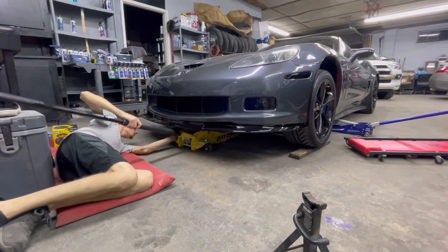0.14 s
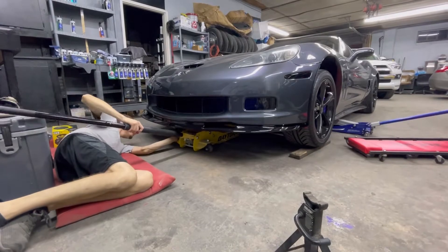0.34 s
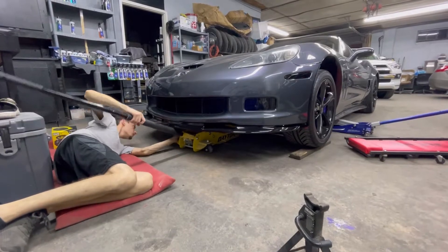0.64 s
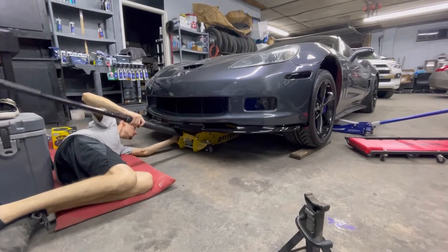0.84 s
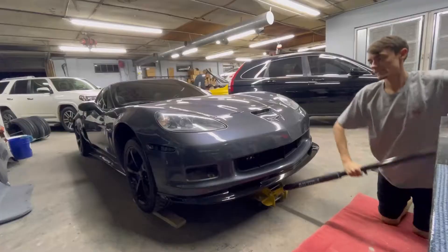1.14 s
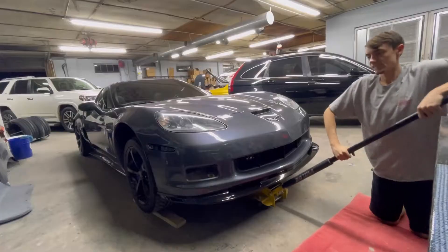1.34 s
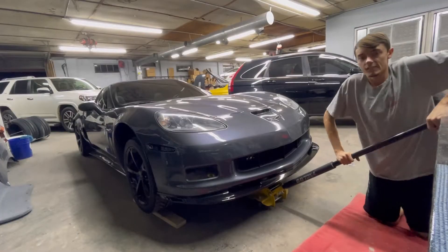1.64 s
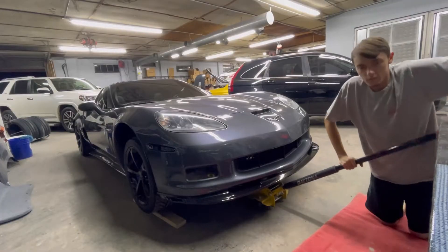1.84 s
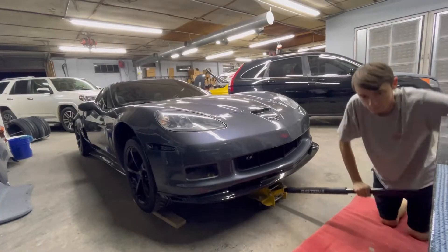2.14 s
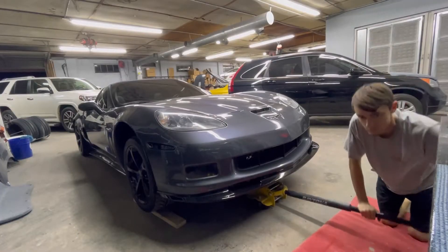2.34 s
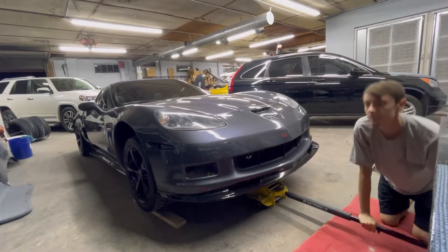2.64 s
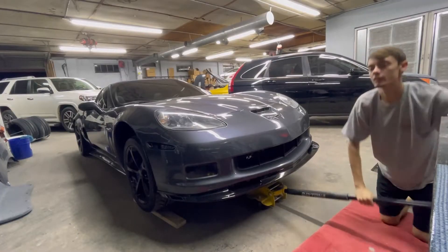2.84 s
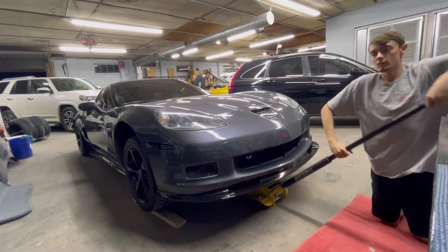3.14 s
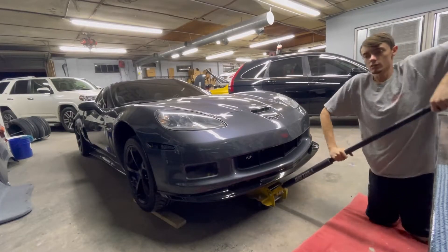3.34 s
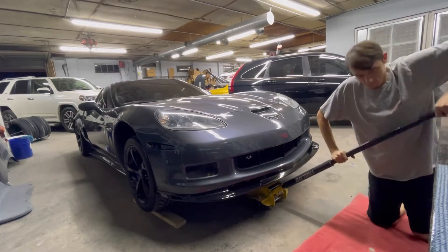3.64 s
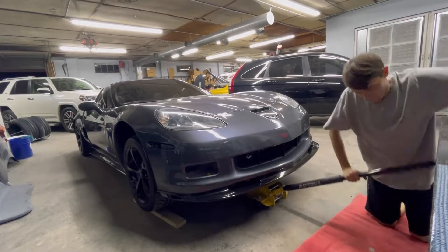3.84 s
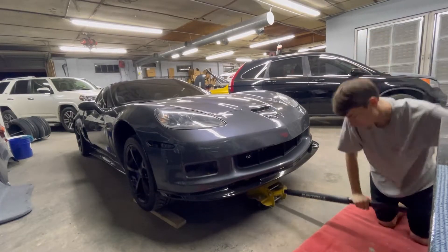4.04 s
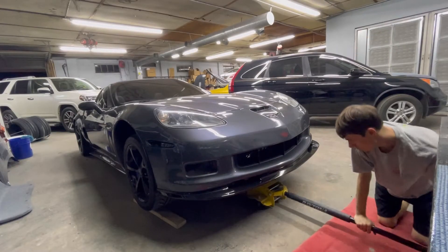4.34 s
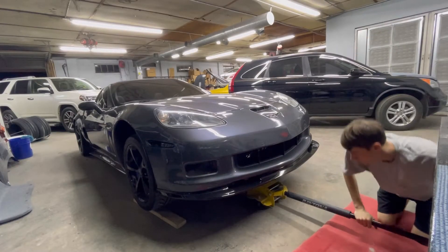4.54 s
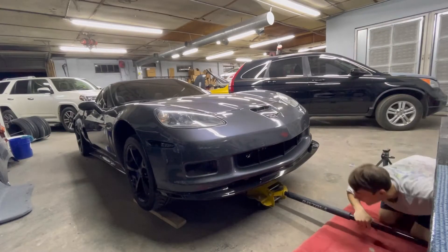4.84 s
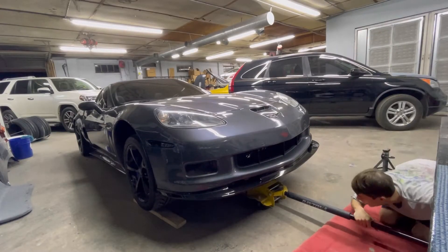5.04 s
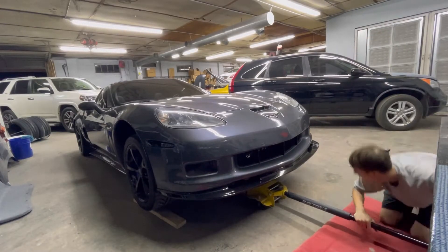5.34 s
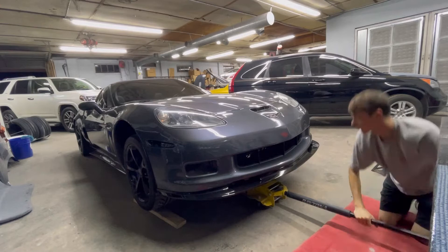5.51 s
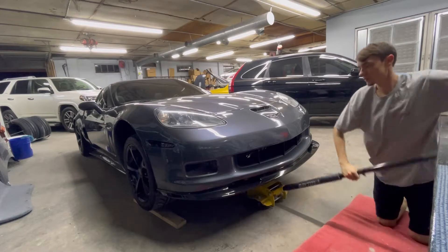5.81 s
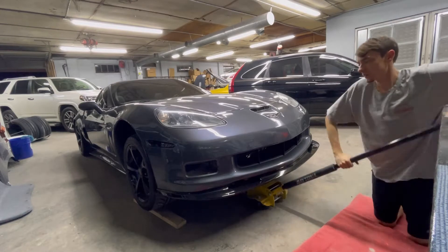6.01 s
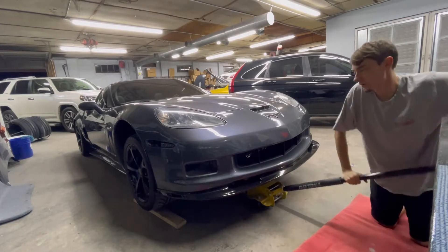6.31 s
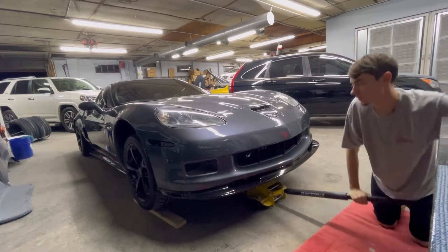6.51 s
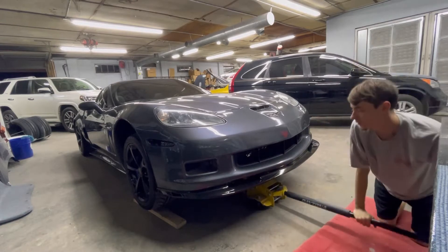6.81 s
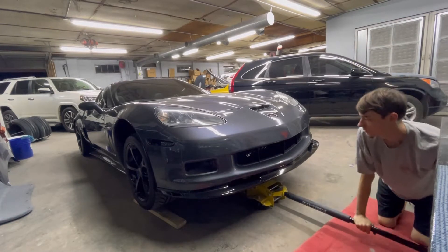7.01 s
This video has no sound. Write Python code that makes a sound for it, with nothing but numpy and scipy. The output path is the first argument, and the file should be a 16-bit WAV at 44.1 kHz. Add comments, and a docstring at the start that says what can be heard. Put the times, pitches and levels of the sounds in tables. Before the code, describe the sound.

In a reverberant garage, a floor jack's long steel handle clinks, then lands with one loud, booming clunk that rings on. Smaller clinks, dull thuds and valve taps follow. Three pump strokes come, each a quick raspy surge of oil with a faint sinking groan; sharp ticks snap around the first two. Clothes rustle on a mat. A faint pulsing high trill and low hum stay underneath. Stereo microphones, somewhat louder on the left.

```python
"""In a garage, a pair of microphones hears a hydraulic floor jack lift a car. Its long steel handle lands with one
loud clunk and clinks in its socket: struck steel modes and short noise bursts. Three pump strokes follow, as clumped
noise for oil and a juddering tone for the piston seal; runs of taps are the valve, and snaps are the lift arm,
around the first two strokes. Clothes rustle on a mat as swelling noise. Over it all lie dull air, narrow bands of
hum and a faint high trill; every source but this room tone is answered by a diffuse echo from the walls."""
import sys
import numpy as np
from scipy import signal
from scipy.fft import rfft, irfft, next_fast_len
from scipy.io import wavfile
from scipy.ndimage import uniform_filter1d, map_coordinates

SR = 44100
rng = np.random.default_rng(int(sys.argv[2]) if len(sys.argv) > 2 else 0)


def bounce(signal):
    """Save signal as a 16-bit WAV file at the path given by the first command-line argument."""
    frames = np.transpose(np.atleast_2d(signal))
    limited = np.clip(frames, -1, 1)
    pcm = np.round(limited * 32767).astype(np.int16)
    wavfile.write(sys.argv[1], SR, pcm)


N = 316197  # length of the scene in samples
T = np.arange(SR) / SR  # time within one blow, in seconds


def amp(db):
    """Decibels to gain."""
    return 10 ** (np.asarray(db) / 20)


def unit(x):
    """Scaled to rms 1."""
    return x / np.sqrt(np.mean(x ** 2) + 1e-20)


def crest(x):
    """Scaled so that the loudest 10 ms have rms 1."""
    power = np.mean(np.atleast_2d(x) ** 2, axis=0)
    return x / np.sqrt(uniform_filter1d(power, size=441).max())


def along(points, hz):
    """Values at hz, read between (Hz, value) points on a log axis."""
    f, v = np.transpose(points)
    return np.interp(np.log(hz + 1), np.log(f + 1), v)


def wobble(rate):
    """A smooth random curve, rate knots a second."""
    knots = rng.standard_normal(int(N * rate / SR) + 4)
    return map_coordinates(knots, [np.arange(N) * rate / SR])


def since(s):
    """Seconds gone by since time s; 0 before it."""
    return np.maximum(np.arange(N) / SR - s, 0)


def arch(s, length):
    """One smooth swell and fade, half a sine long."""
    return np.sin(np.pi * np.minimum(since(s) / length, 1))


def filtered(x, response):
    """x times a response of frequency."""
    n = x.shape[-1]
    m = next_fast_len(n + 8192)  # room for the filter to ring out
    return irfft(rfft(x, m) * response(np.fft.rfftfreq(m, 1 / SR)), m)[..., :n]


def coloured(x, spectrum):
    """Causal (minimum-phase) filter with the given (Hz, dB) points."""
    def response(hz):
        cepstrum = irfft(np.log(amp(along(spectrum, hz)) + 1e-6))
        half = len(cepstrum) // 2
        # folding the cepstrum forward in time makes the filter causal
        return np.exp(rfft(np.r_[cepstrum[0], 2 * cepstrum[1:half], np.zeros(half)]))
    return filtered(x, response)


def grainy(spectrum, rough_db, rate):
    """Coloured noise of rms 1 that comes in clumps, set by rate random knots a second."""
    clumps = amp(rough_db * wobble(rate))
    return unit(coloured(rng.standard_normal(N) * clumps, spectrum))


def fade(t60):
    """Exponential decay by 60 dB in t60 seconds."""
    return amp(-60 * T / max(t60, 1e-3))


def burst(t60):
    """The noise of one contact."""
    return rng.standard_normal(len(T)) * fade(t60)


def snap(t60, scrape_db):
    """One sharp impulse with a short scrape of the faces."""
    scrape = burst(t60)
    return (T == 0) + amp(scrape_db) * scrape / np.linalg.norm(scrape)


def ring(modes, scatter_db, longest):
    """Damped modes, struck at new strengths; none rings beyond the longest t60."""
    out = np.zeros(len(T))
    for hz, db, t60 in modes:
        strength = amp(db + scatter_db * rng.normal())
        out += strength * fade(min(t60, longest)) * np.sin(2 * np.pi * hz * T)
    return out


def add(track, s, x):
    """Mix x into the track at time s."""
    part = track[:, round(s * SR):][:, :x.shape[-1]]
    part += x[..., :part.shape[1]]


# how alike the diffuse sound is at the two microphones: f/Hz, likeness (1 same, 0 unrelated, -1 opposed)
LIKENESS = [(60, 0.92), (130, 0.24), (290, 0.69), (640, 0.021), (3000, -.15), (8000, -.25), (13000, -0.71)]


def diffuse(count):
    """Stereo noise from all sides: alike in the deepest bass, increasingly opposed in the treble."""
    def turn(hz):
        return np.arccos(np.clip(along(LIKENESS, hz), -1, 1)) / 2
    noise = rng.standard_normal((2, count))
    mid, side = filtered(noise, lambda hz: np.array([np.cos(turn(hz)), np.sin(turn(hz))]))
    return np.array([mid + side, mid - side])


# how long the garage walls answer: f/Hz, t60/s
WALL_DECAY = [(100, 0.56), (500, 0.5), (2000, .46), (6000, 0.38), (14000, 0.2)]
LEAD_S = 20 / SR  # head start of the left microphone


def garage(x, wet_db):
    """Direct sound reaches the left microphone first; the walls answer with a diffuse tail."""
    hz, t, z = signal.stft(diffuse(count=SR * 3 // 4), SR, nperseg=256)
    decay = amp(-60 * t / along(WALL_DECAY, hz)[:, None])
    tail = signal.istft(z * decay, SR, nperseg=256)[1]
    echo = signal.fftconvolve(x[None], tail / np.linalg.norm(tail[0]), axes=1)[:, :len(x)]
    late = np.pad(x, (round(LEAD_S * SR), 0))[:len(x)]
    return np.array([x, late]) + amp(wet_db) * echo


def narrow(centre_hz, width):
    """Diffuse noise of rms 1 in one narrow band, about width Hz across at half amplitude."""
    return unit(filtered(diffuse(count=N), lambda hz: 1 / (1 + (1.9 * (hz - centre_hz) / width) ** 2)))


# colour of the still air: f/Hz, relative level/dB
AIR_COLOUR = [(20, -20.5), (65, 1.5), (220, -15.5), (320, -21.5), (1100, -15.5), (1750, -24.5), (2200, -23),
              (3000, -33), (4200, -42), (5800, -33.5), (7400, -40.5), (8500, -37), (11000, -43),
              (15500, -49)]
# steady narrow bands in the room, low hum upwards: f/Hz, width/Hz, rms level/dB
HUM_BANDS = [(159, 8, -73.5), (233.2, 14, -75), (1120, 200, -79.5), (2110, 130, -75.5), (2580, 25, -84),
             (6180, 330, -74.5)]
TRILL_DB, TRILL_SWING_DB, TRILL_DRIFT_DB = -68.5, 1.5, 0.2  # middle level, regular swell, slow chance
TRILL_PERIOD_S, TRILL_CREST_S = 0.6, 2.2  # time between swells, and the top of one of them


def room_tone():
    """Dull air noise with narrow bands of hum, and a high trill that swells and sinks at a steady pace."""
    out = amp(-64.0) * unit(coloured(diffuse(count=N), AIR_COLOUR))
    for centre_hz, width, db in HUM_BANDS:
        out += amp(db) * narrow(centre_hz, width)
    swell = np.cos(2 * np.pi * (np.arange(N) / SR - TRILL_CREST_S) / TRILL_PERIOD_S)
    trill_db = TRILL_DB + TRILL_SWING_DB * swell + TRILL_DRIFT_DB * wobble(rate=3)
    return out + amp(trill_db) * narrow(centre_hz=5037, width=230)


# the body shifts on the mat: start t/s, length t/s, swish level/dB (before a common trim), scuff level/dB
RUSTLES_ON_MAT = [(0.0, 0.043, -69, -56), (1.05, 0.19, -57.5, -72), (1.235, 0.19, -69.5, -73),
                  (1.513, 0.13, -87, -62.5), (2.657, 0.43, -58.5, -70.5), (4.376, 0.21, -58.5, -59),
                  (5.676, 0.098, -72, -69.5), (6.927, 0.21, -62, -64.5)]
# colour of fabric brushing fabric: f/Hz, relative level/dB
SWISH_COLOUR = [(3530, -44), (6000, -10.5), (9040, -3), (10500, -10.5), (13100, -6.5), (16000, -44)]
# colour of knees on the mat: f/Hz, relative level/dB
SCUFF_COLOUR = [(100, -22.5), (250, -5), (1200, -10), (2500, -14.5), (4000, -19.5), (6500, -22),
                (10000, -33.5)]
# the handle is pushed down, heard in clothes, valve, oil and seal: start t/s, length t/s,
# opening surge level/dB, surge decay t/s (time constant), steady flow level/dB,
# closing swell level/dB (lost under the steady flow in the third),
# starting groan f/Hz, groan level/dB, sleeve swish level/dB (before the swish trim)
PUMP_STROKES = [(1.871, 0.695, -46.5, 0.13, -77, -61, 205, -60.5, -75),
                (3.724, 0.58, -49.5, 0.052, -65.5, -58.5, 200, -58.5, -68),
                (6.258, 0.656, -55.5, 0.051, -53.5, -82, 235, -64, -74)]
SLEEVE_SCUFF_DB, SLEEVE_S = -2.5, 0.43  # sleeves rub in every stroke: scuff against untrimmed swish, length


def clothes():
    """Fabric swishes and knees scuff on the mat, each move swelling and fading."""
    swish, scuff = np.zeros(N), np.zeros(N)
    sleeves = [(s, SLEEVE_S, db, db + SLEEVE_SCUFF_DB) for s, *_, db in PUMP_STROKES]
    for s, length, swish_db, scuff_db in RUSTLES_ON_MAT + sleeves:
        move = arch(s, length)
        swish += amp(swish_db) * move
        scuff += amp(scuff_db) * move
    fabric = amp(-7.0) * swish * grainy(SWISH_COLOUR, rough_db=3.5, rate=470)
    knees = scuff * grainy(SCUFF_COLOUR, rough_db=5.5, rate=91)
    return garage(fabric + knees, wet_db=4)


# the handle shifts in its socket: t/s, level/dB (before the edge and body trims), body against edge level/dB
HANDLE_CLINKS = [(0.0981, -45.5, 3), (0.539, -53, -2), (0.676, -49.5, 3), (0.772, -45, 0),
                 (1.4576, -51, -1.5), (2.7168, -51.5, -4.5), (3.286, -49, -2.5), (5.5415, -49.5, -9),
                 (6.015, -45, -3.5)]
# modes of the gripped socket: f/Hz (before scatter), level/dB, free t60/s (the grip cuts it short)
SOCKET_MODES = [(2418, -9, 0.16), (3890, -9.5, 0.13), (5210, 2.5, .12), (5680, -7, .12), (8220, -6, 0.22),
                (9400, -5.5, 0.1516), (13100, -8.5, .12)]
# colour of the bright edge: f/Hz, relative level/dB
CLINK_EDGE = [(2000, -18), (4400, -17), (5400, -1), (6100, -8), (7200, -10), (8200, -4.5), (9400, -3),
              (10500, -14), (13000, -0.5), (15800, -21.5)]
# colour of the duller body: f/Hz, relative level/dB
CLINK_DULL = [(120, -39), (200, -9.5), (355, -3), (568, -9.5), (996, -2), (2060, -12), (2460, -13),
              (4200, -23.5), (5460, -52), (9240, -120)]
# the handle rings freely when let go: f/Hz, level/dB, t60/s
FREE_HANDLE = [(1222, 0, .7), (2630, -19, .9), (3580, -4, .3)]


def clinks():
    """The loose handle knocks in its socket: a bright edge, pitched anew at each contact, over a duller body."""
    out = np.zeros((2, N))
    for s, db, body_db in HANDLE_CLINKS:
        modes = [(hz * (1 + 0.013 * rng.normal()), level, t60) for hz, level, t60 in SOCKET_MODES]
        gripped = amp(-7) * crest(ring(modes, scatter_db=3, longest=.11))
        edge = crest(coloured(burst(t60=0.038), CLINK_EDGE)) + gripped
        body = coloured(burst(t60=0.059) * (1 - fade(t60=0.015)), CLINK_DULL)
        add(out, s, amp(db - 2.0) * crest(garage(edge, wet_db=5.5)))
        add(out, s, amp(db + body_db + 2.0) * crest(garage(body, wet_db=8.0)))
    free = ring(FREE_HANDLE, scatter_db=.5, longest=1)
    add(out, 0.773, amp(-48.0) * crest(garage(free, wet_db=-12.0)))
    return out


# dull low thuds and short mid-pitched knocks: t/s, level/dB, f/Hz
THUDS_AND_KNOCKS = [(0.734, -42, 100), (0.824, -44.5, 99), (0.96, -55, 472), (2.7, -49, 398),
                    (2.712, -42.5, 116), (2.72, -47, 236), (3.038, -51, 121), (3.29, -58, 380),
                    (3.66, -56.5, 190), (5.509, -53.5, 340), (5.541, -49, 136.4), (6.103, -48.5, 143)]
DECAY_CYCLES = 30  # each falls by 60 dB within this many cycles
THUMP_DB, THUMP_HZ = -10.5, 185  # each clink also has a low thump: against its table level, pitch


def thuds():
    """Dull thuds and short knocks, each a narrow band of decaying noise; the lower, the longer it lasts."""
    out = np.zeros((2, N))
    thumps = [(s, db + THUMP_DB, THUMP_HZ) for s, db, _ in HANDLE_CLINKS]
    for s, db, hz in THUDS_AND_KNOCKS + thumps:
        band = [(hz / 4, -35), (hz * 0.61, -6), (hz, 0), (hz * 1.2, -14), (hz * 4, -32), (hz * 10, -70)]
        thud = coloured(burst(DECAY_CYCLES / hz), band)
        add(out, s, amp(db) * crest(garage(thud, wet_db=-6.5)))
    return out


# contacts within the clunk: t/s, level/dB
CLUNK_BLOWS = [(0.185, -21.5), (0.189, -19), (0.1957, -16)]
# colour of the clunk's dense clatter: f/Hz, relative level/dB
CLATTER = [(30, -23), (60, -11.5), (250, -11), (450, -14), (800, -17), (1300, -20.5), (2500, -24),
           (3500, -25.5), (4700, -36.5), (6900, -31.5), (7700, -42), (9200, -38.5), (10500, -49.5),
           (15500, -51.5)]
# jack frame and car body under the clunk: f/Hz, level/dB, t60/s
FRAME_MODES = [(60, -14.5, 0.35), (85.5, -14.5, 0.42), (100, -7.5, 0.22), (111.55, 0, .4), (163, -2.5, .3),
               (214.3, 2.5, 0.29), (239.3, 4, 0.19), (280, 2.5, .17), (296, 3.5, 0.14), (354, -9, 0.44),
               (528, -11.5, 0.38), (795, -18, 0.35)]
# steel of the handle: f/Hz, level/dB, t60/s
STEEL_MODES = [(1165, -2, .3), (2479, -1, .3), (3306, -3, .28), (4150, -9, .25), (5880, -12, .35),
               (6840, -9, .3), (14750, -18, .25), (5180, -11, .45), (5234, -7, .6), (5314, -4, .6),
               (5399, -7, .7), (5562, -13, .65)]


def clunk():
    """Steel meets steel, then the weight lands and shakes the frame; the handle rings on."""
    out = np.zeros((2, N))
    for s, db in CLUNK_BLOWS:
        clatter = coloured(snap(t60=0.064, scrape_db=-1), CLATTER)
        add(out, s, amp(db) * crest(garage(clatter, wet_db=4.5)))
    load = (1 - fade(t60=0.054)) * (1 + 1.7 * fade(t60=.2))  # the frame swings hardest while the weight settles
    boom = ring(FRAME_MODES, scatter_db=0.03, longest=.5) * load
    add(out, 0.1893, -amp(-9.6) * crest(garage(boom, wet_db=-14.5)))
    steel = ring(STEEL_MODES, scatter_db=1.5, longest=.9)
    add(out, 0.1855, amp(-30) * crest(garage(steel, wet_db=-3)))
    return out


# the valve ball chatters on its seat: t/s, level/dB (before a common trim), length t/s
VALVE_CHATTERS = [(0.69, -47.5, 0.042), (1.75, -44, 0.017), (2.655, -55, 0.029), (2.691, -47.5, 0.02),
                  (3.644, -41, 0.019), (4.445, -57.5, 0.022), (4.499, -67, 0.025), (5.493, -52, 0.027),
                  (6.091, -37, 0.014)]
# colour of the valve taps: f/Hz, relative level/dB
VALVE_COLOUR = [(200, -15.5), (450, -10.5), (640, -12.5), (780, 4.5), (950, -4), (1400, -5.5), (2050, -4),
                (2450, -13), (3200, -21.5), (4500, -44), (8000, -51)]
OPENING_DB, OPENING_S = -6, 0.015  # chatter as a stroke opens the valve: against the surge before trim, length


def valve():
    """The valve ball gives a quick run of random taps, also as each stroke opens it."""
    out = np.zeros((2, N))
    openings = [(s, surge_db + OPENING_DB, OPENING_S) for s, _, surge_db, *_ in PUMP_STROKES]
    for s, db, length in VALVE_CHATTERS + openings:
        run = (1 - fade(t60=0.039)) * np.exp(-(T / length) ** 2)
        hits = rng.random(len(T)) < 1500 / SR  # about 1500 taps a second
        taps = hits * rng.standard_normal(len(T)) * run
        add(out, s, amp(db + 3.0) * crest(garage(coloured(taps, VALVE_COLOUR), wet_db=-1.0)))
    return out


# colour of the oil stream: f/Hz, relative level/dB
FLOW_COLOUR = [(100, -7), (220, -4), (340, -12), (480, 0), (600, -2.5), (720, 3.5), (860, -6), (1200, -8),
               (1800, -32), (3000, -58)]
# colour of the rasp through the valve: f/Hz, relative level/dB
RASP_COLOUR = [(400, -17.5), (560, 1.5), (720, 10.5), (900, 2), (1300, -1), (1900, -3.5), (2450, -14.5),
               (2900, -21), (4500, -42)]
OPEN_S, CLOSE_S = 0.0043, 0.14  # time for the oil to start and to stop flowing
SWELL_S, SWELL_BEFORE_END_S = 0.13, 0.055  # width and place of the closing swell


def oil():
    """Oil surges and rasps, then flows duller; the first two strokes end in a swell, the third holds nearly steady."""
    flow, rasp = np.zeros(N), np.zeros(N)
    for s, length, surge_db, surge_s, steady_db, swell_db, *_ in PUMP_STROKES:
        age = since(s)
        valve_open = np.clip(np.minimum(age / OPEN_S, (length - age) / CLOSE_S + .5), 0, 1)
        surge = amp(surge_db) * np.exp(-age / surge_s)
        swell = amp(swell_db) * np.exp(-((age - length + SWELL_BEFORE_END_S) / SWELL_S) ** 2)
        push = valve_open * (surge + amp(steady_db) + swell)
        flow += push
        rasp += push * amp(-9.0 + 15.1 * np.exp(-age / 0.067))  # the rasp leads, then sinks under the flow
    stream = flow * grainy(FLOW_COLOUR, rough_db=0, rate=280)
    stream += rasp * grainy(RASP_COLOUR, rough_db=3.5, rate=140)
    return garage(stream, wet_db=0)


GROAN_SAG_OCT_PER_S, GROAN_LENGTH_S = 1.1, 0.6  # the groan sinks in pitch; length of its swell and fade


def groan():
    """The piston seal judders at an unsteady rate that falls through each stroke."""
    out = np.zeros(N)
    for s, *_, start_hz, db, _ in PUMP_STROKES:
        hz = start_hz * 2 ** (-GROAN_SAG_OCT_PER_S * since(s))
        phase = 2 * np.pi * np.cumsum(hz * (1 + 0.0578 * wobble(rate=76))) / SR
        judder = np.sin(phase) + amp(-9.0) * np.sin(2 * phase)
        out += amp(db) * arch(s, GROAN_LENGTH_S) * unit(judder * amp(2.7 * wobble(rate=30)))
    return garage(out, wet_db=-10.5)


# the lift arm slips under load: t/s, level/dB (before a common trim)
ARM_TICKS = [(2.2135, -48.5), (2.392, -58), (2.5528, -52), (2.6591, -55.5), (3.6505, -63.5), (4.0504, -48),
             (4.2528, -49), (4.375, -61)]
# colour of one tick: f/Hz, relative level/dB
TICK_COLOUR = [(150, -8.5), (700, 0), (2500, -9), (4500, -11), (6500, -6), (10400, -12), (12300, -3),
               (15800, -27)]


def ticks():
    """Short snaps of the loaded arm, answered by the room."""
    out = np.zeros((2, N))
    for s, db in ARM_TICKS:
        slip = garage(coloured(snap(t60=.022, scrape_db=6), TICK_COLOUR), wet_db=4.5)
        add(out, s, amp(db + 4.5) * crest(slip))
    return out


# balance of the two microphones: f/Hz, left minus right level/dB
LEFT_TILT = [(100, -0.5), (300, 1), (650, 2.5), (2300, 2.5), (5000, 7), (8000, 1.5), (14000, -0.5)]


def scene():
    """All sources, louder on the left over most of the range."""
    mix = room_tone() + clothes() + clinks() + thuds() + clunk() + valve() + oil() + groan() + ticks()
    return filtered(mix, lambda hz: amp(np.outer([.5, -.5], along(LEFT_TILT, hz))))


TOP_HZ = 15800  # band limit of the microphones


def record(dry):
    """The microphones shed the deepest bass and fall away steeply above their band limit."""
    high_pass = signal.butter(2, 42, "highpass", fs=SR, output="sos")
    thinned = signal.sosfilt(high_pass, dry)
    return filtered(thinned, lambda hz: 1 / (1 + (hz / TOP_HZ) ** 160))


dry = scene()
out = record(dry)
bounce(out)
```